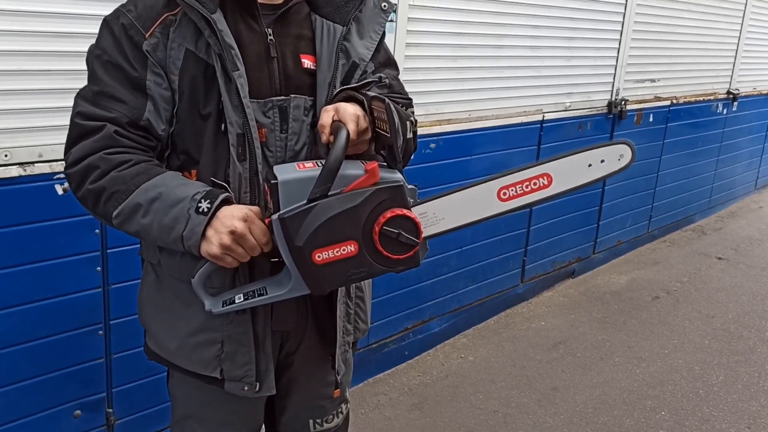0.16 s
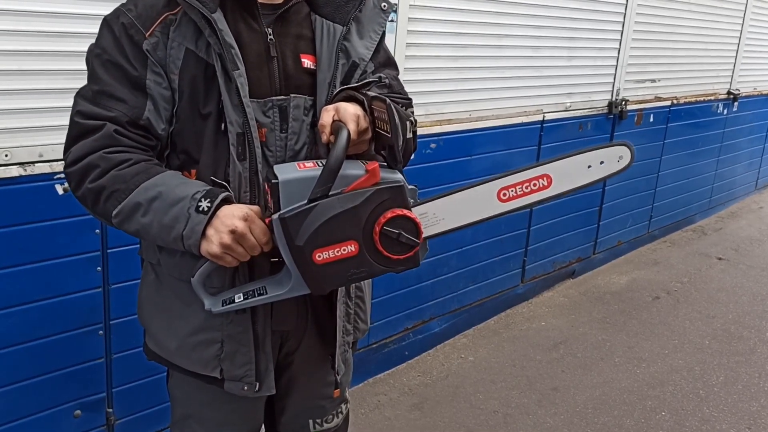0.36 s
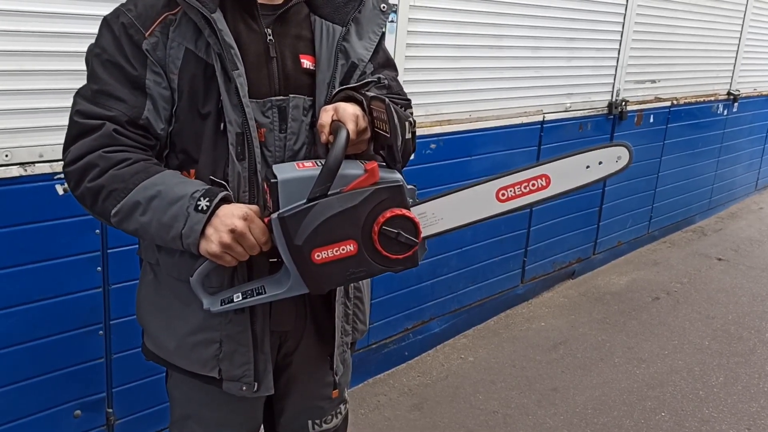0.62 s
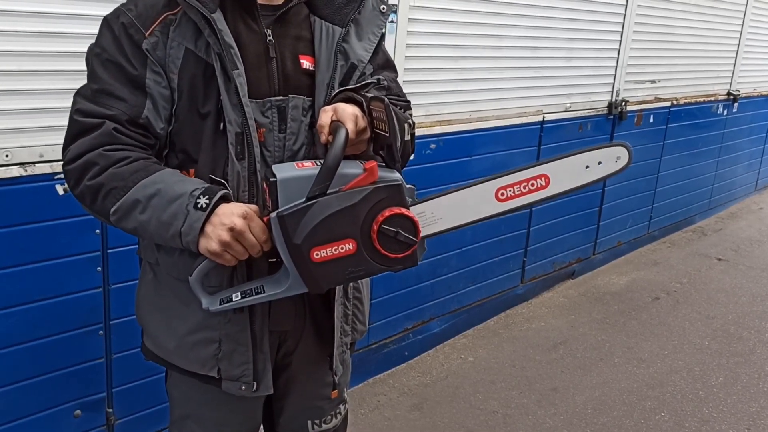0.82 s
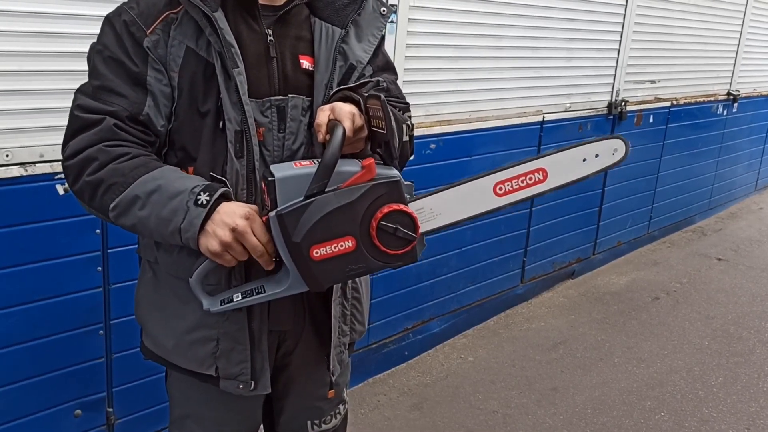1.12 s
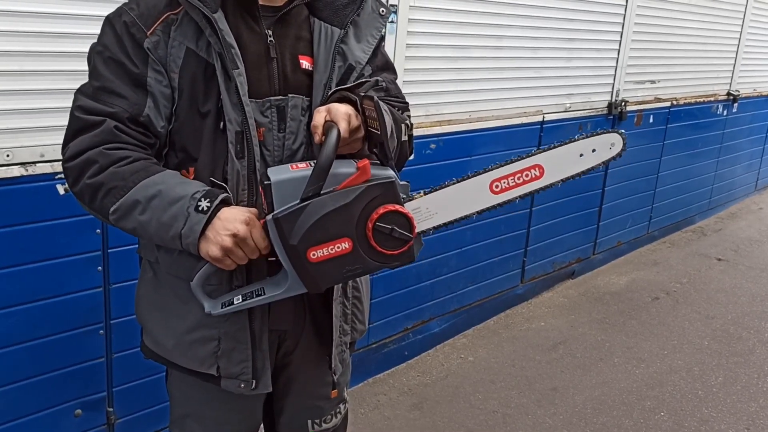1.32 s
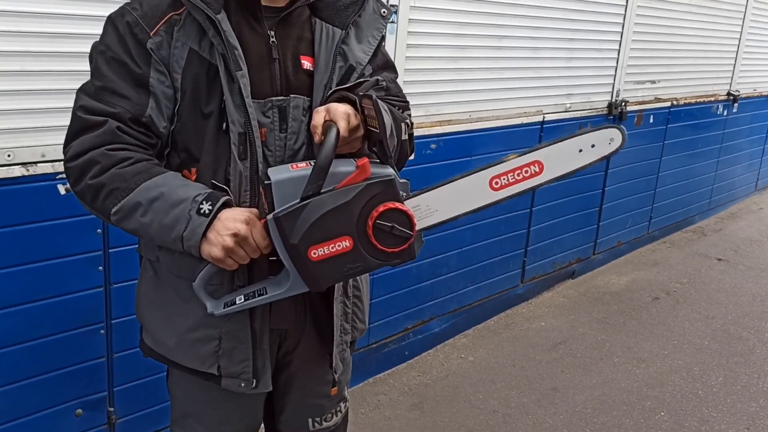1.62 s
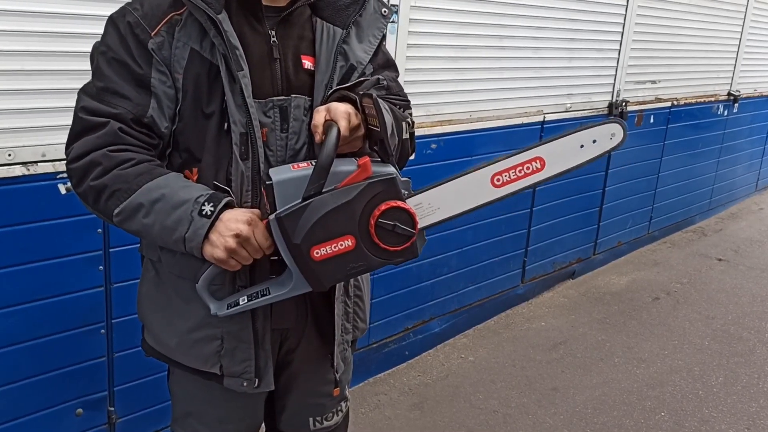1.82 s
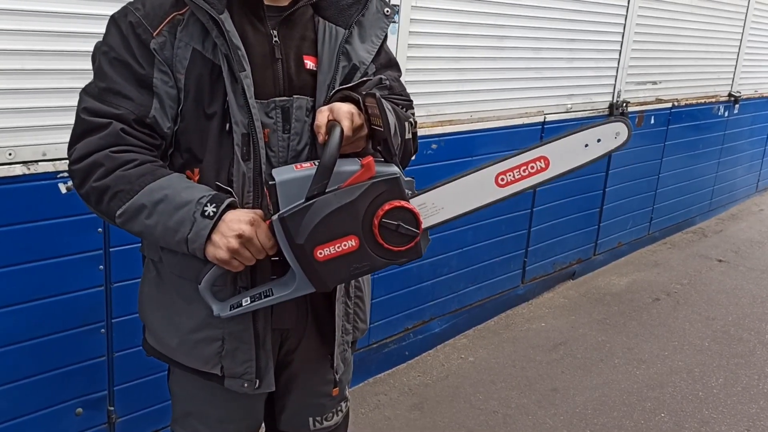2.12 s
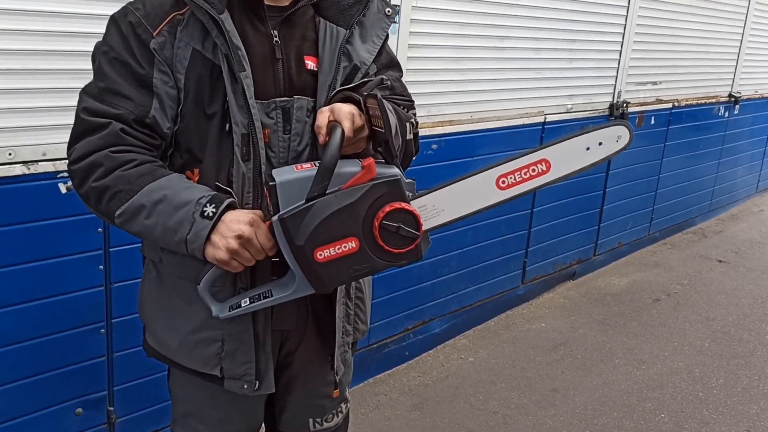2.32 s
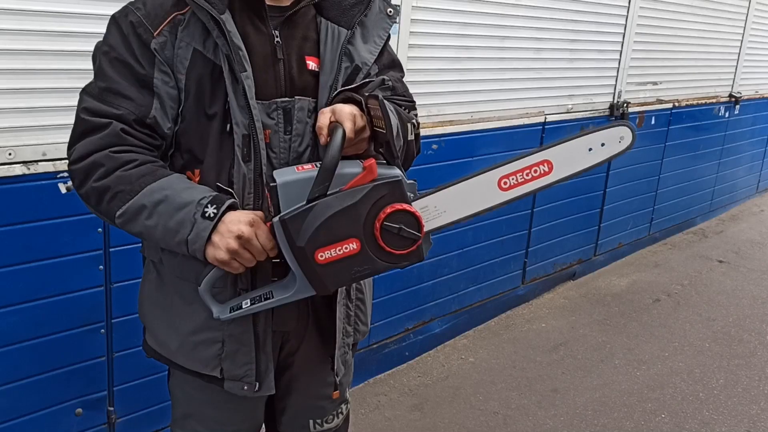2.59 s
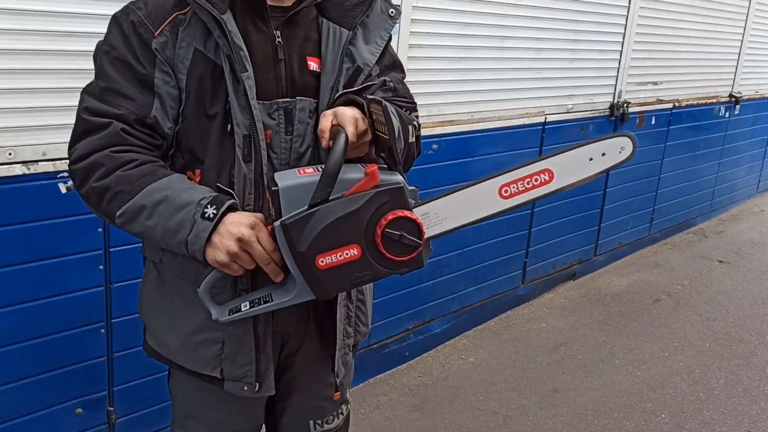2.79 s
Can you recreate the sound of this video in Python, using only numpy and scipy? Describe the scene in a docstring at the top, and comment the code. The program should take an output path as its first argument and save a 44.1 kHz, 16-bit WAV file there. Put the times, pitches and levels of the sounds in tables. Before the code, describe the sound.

Close electric chainsaw with bright metallic chain hiss and a rough gear whine, dropping to a clattering stop, a brief near-silence with faint hum and clicks, then a rising restart, full speed and final slowing, with short yard echo.

```python
"""A battery chainsaw runs free, outdoors beside a shuttered wall. The trigger is let go: the whine sinks
and the slackening chain rattles to a stop. A faint hum coasts down, trigger and switch click, the saw
spins up to full speed again and at the end winds down once more. One shaft speed drives the partials of
the whine, the noise bursts and hiss of the links and the struck modes of the bar; hum and clicks are
timed apart. Wall and yard echo the saw; open air and a dull rumble lie underneath."""
import sys
import numpy as np
from scipy import signal
from scipy.fft import rfft, irfft
from scipy.io import wavfile
from scipy.ndimage import uniform_filter1d

SR = 44100
rng = np.random.default_rng(int(sys.argv[2]) if len(sys.argv) > 2 else 0)


def persist_wave(psi):
    """Save psi, clipped to +-1, as 16-bit WAV."""
    counts = np.round(np.clip(psi, -1, 1) * 32767).astype(np.int16)
    wavfile.write(sys.argv[1], SR, np.atleast_2d(counts).T)


N = 130095
TIME_S = np.arange(N) / SR


def amp(db):
    """Decibels to gain."""
    return 10 ** (np.asarray(db) / 20)


def unit(x):
    """Scales to rms 1."""
    return x / np.sqrt(np.mean(x ** 2) + 1e-20)


def curve(points, at, axis=1):
    """Reads one column of a table along straight lines."""
    table = np.array(points, float)
    return np.interp(at, table[:, 0], table[:, axis])


def spectrum(points, hz):
    """Reads a table on a log-frequency axis."""
    f, value = np.transpose(points)
    return np.interp(np.log(hz + 1), np.log(f), value)


def colour(x, points):
    """Minimum-phase filter of unit energy, shaped by the given spectrum."""
    size = 8192
    log_gain = np.log(amp(spectrum(points, abs(np.fft.fftfreq(size, 1 / SR)))))
    taps = np.fft.ifft(np.exp(signal.hilbert(log_gain).conj())).real[:size // 2]
    return signal.fftconvolve(x, taps / np.linalg.norm(taps))[:N]


def wander(hz):
    """Slow random signal of rms 1, rolled off above the given rate."""
    f = np.fft.rfftfreq(N, 1 / SR)
    return unit(irfft(rfft(rng.standard_normal(N)) / (1 + (f / hz) ** 2), N))


def tail(x, decays):
    """Convolves with a dense 1 s noise tail, each band dying at its own t60."""
    hz, t, z = signal.stft(rng.standard_normal(SR), SR, nperseg=256)
    decay = np.exp(-np.log(1000) * t / spectrum(decays, hz)[:, None])
    taps = signal.istft(z * decay, SR)[1]
    taps[:SR // 200] = 0  # 5 ms gap
    return signal.fftconvolve(x, taps / np.linalg.norm(taps))[:N]


# sprocket speed before flutter [t/s, f/Hz]
SHAFT_SPEED = [(0, 109.25), (.108, 109.4), (.856, 109.55), (.87, 107.7), (.898, 99.9), (.982, 71.7),
               (1.02, 60.7), (1.112, 38.5), (1.2, 17), (1.228, 0), (1.555, 0), (1.58, 15.5), (1.65, 17.5),
               (1.675, 27), (1.7, 33.2), (1.8, 54.7), (1.88, 71.5), (1.992, 90.9), (2.092, 105.9),
               (2.156, 108.6), (2.33, 109.6), (2.652, 109.8), (2.702, 98.9), (2.764, 77.3), (2.858, 49.5),
               (2.95, 28)]
FLUTTER, FULL_LOAD_TURNS_PER_S2 = .001, 240


def shaft():
    """Speed, its integral in turns, and load: smoothed acceleration, positive when speeding up."""
    steady = curve(SHAFT_SPEED, TIME_S)
    acceleration = uniform_filter1d(np.gradient(steady) * SR, size=1500)
    load = np.clip(acceleration / FULL_LOAD_TURNS_PER_S2, -1, 1)
    speed = steady * (1 + FLUTTER * wander(hz=24.56))
    return speed, np.cumsum(speed) / SR, load


# strong drive partials [multiple of shaft speed (rounded), relative level/dB at full speed, power of speed]
DRIVE_ORDERS = [(3, -34, 0.35), (5, -17.5, 5.2), (6, -2, 1.8), (7, -5.5, 12), (8, -5.5, 12), (9, -14, 2.6),
                (11, -11, 3.9), (12, 2.5, 3.8), (13, -6, 4.9), (15, -17, 2.8), (16, -17.5, 2),
                (17, -10, 4.5), (18, -8.5, 0.48), (19, -22.5, 6), (21, -10.5, 3.8), (23, -18.5, 1),
                (25, -8, 5.9), (27, -9, 4.9), (30, 0.5, 7), (31, -18, 7), (33, -49, 7), (42, -14, 6.5),
                (87.5, -31, 6)]
# radiation of bar and housing [f/Hz, relative level/dB]
HOUSING = [(40, -60), (130, -21), (250, -9.5), (380, -3), (470, -10), (535, -11), (570, 2), (610, 1),
           (680, -4), (750, -1.5), (850, 17), (950, -2), (1100, 4), (1230, -2), (1315, -1.5), (1450, 5.5),
           (1620, 3.5), (1750, -7), (1950, -4), (3000, -13.5), (3300, -6), (5000, -20)]
WHINE_DB, LOAD_WHINE_DB = -25, 0.5
WHINE_ROUGH, LOAD_ROUGH, LOAD_JITTER_TURNS = 0.075, 0.28, .04


def whine(speed, turns, load):
    """Gear and sprocket partials slide through the housing resonances, rougher while speed changes."""
    full, out = speed.max(), np.zeros(N)
    rough = WHINE_ROUGH + LOAD_ROUGH * abs(load)
    for multiple, db, power in DRIVE_ORDERS:
        k = round(multiple)
        body_db = spectrum(HOUSING, k * speed) - spectrum(HOUSING, k * full)
        level = amp(db + body_db) * (speed / full) ** power
        level *= 1 + rough * wander(hz=32.5)
        cycles = k * turns + rng.random() + LOAD_JITTER_TURNS * load * wander(hz=45.3)
        out += level * np.sin(2 * np.pi * cycles)
    return np.sqrt(2) * amp(WHINE_DB + LOAD_WHINE_DB * load) * out


TEETH = 6


def link_hits(turns, spread_db):
    """One blow of random strength for each link that meets the sprocket."""
    contacts = np.diff(np.floor(turns * TEETH), prepend=0)
    return contacts * amp(spread_db * rng.standard_normal(N).clip(-2, 2))


# clatter of the links [f/Hz, relative density/dB per Hz]
CLATTER = [(60, -35.5), (200, -27.5), (360, -27.5), (500, -15.5), (600, -8), (780, 0), (1050, -3),
           (1280, -2), (1700, -4.5), (2200, -3), (2450, 2), (2800, -2), (3250, 7), (3700, 5.5), (4100, 5.5),
           (4700, 5.5), (4900, -3.5), (5900, 2), (6200, 10), (6900, 7), (7600, 5.5), (7750, -4),
           (8450, -6.5), (8700, -24.5), (11450, -22.5), (16000, -35.5)]
# clatter against shaft speed [f/Hz, relative level/dB]
CLATTER_BY_SPEED = [(0, -60), (4, -16), (12, -10.5), (25, -2), (35, -3.5), (60, 0), (110, -1)]
# top fizz of the sliding chain [f/Hz, relative density/dB per Hz]
FIZZ = [(9000, -47), (11400, -30), (11650, 3), (12600, -4), (14000, 1), (15800, -1.5)]
CLATTER_DB, SHAKE_DB, TURN_DEPTH = -18, 0.71, 0.038
LINK_SHARE, LINK_SPREAD_DB, LINK_DECAY_S = 0.077, 6, 0.0023
FIZZ_DB, FIZZ_POWER = -29, 0.23


def clatter(speed, turns):
    """Links burst over the hiss of the chain sliding in its groove; fizz grows with speed."""
    decay = np.exp(-1 / (LINK_DECAY_S * SR))
    bursts = signal.lfilter([1], [1, -decay], link_hits(turns, LINK_SPREAD_DB))
    grain = LINK_SHARE * unit(bursts / np.sqrt(speed + 10)) + 1 - LINK_SHARE
    level = amp(curve(CLATTER_BY_SPEED, speed) + SHAKE_DB * wander(hz=50))
    level *= 1 + TURN_DEPTH * np.cos(2 * np.pi * turns)
    rub = unit(grain) * level * rng.standard_normal(N)
    fizz = colour(rub * (speed / speed.max()) ** FIZZ_POWER, FIZZ)
    return amp(CLATTER_DB) * colour(rub, CLATTER) + amp(FIZZ_DB) * fizz


# short ringing of chain and bar [f/Hz, t60/s]
STEEL = [(200, 0.046), (900, 0.087), (2500, 0.099), (4000, .18), (6800, 0.28), (14000, 0.17)]
STEEL_DB = -10


def steel_ring(chain):
    """Chain and bar ring on briefly after each contact."""
    return (chain + amp(STEEL_DB) * tail(chain, STEEL)) / np.hypot(1, amp(STEEL_DB))


# bar modes [f/Hz, width/Hz, relative level/dB]
BAR_MODES = [(729, 43, -4.5), (818, 120, -2), (855, 32.6, 1), (1204, 90, -9.5), (1480, 170, -11),
             (1950, 250, -14), (2493, 75, -13), (3280, 160, -10.5), (4100, 120, -10.5)]
# slap against shaft speed [f/Hz, relative level/dB]
SLAP_BY_SPEED = [(0, -60), (4, -5), (15, -2), (28, 2), (47, 0.5), (58, -1.5), (72, -2), (85, -9),
                 (100, -16.5), (110, -13.5)]
SLAP_DB, LOAD_SLAP_DB, SLAP_SPREAD_DB, NOSE_LAG_TURNS = -19.5, 1.5, 2.5, .07


def slap(speed, turns, load):
    """At low speed the slack chain beats on the bar, at sprocket and nose, and excites its modes."""
    blows = link_hits(turns, SLAP_SPREAD_DB) + link_hits(turns + NOSE_LAG_TURNS, SLAP_SPREAD_DB)
    hits = blows * rng.choice([-1, 1], N) / np.sqrt(speed + 2)
    t, ring = TIME_S[:SR // 4], np.zeros(SR // 4)
    for k, (hz, width_hz, db) in enumerate(BAR_MODES):
        mode = np.exp(-np.pi * width_hz * t) * np.sin(2 * np.pi * hz * t)
        ring += (-1) ** k * amp(db) * np.sqrt(width_hz) * mode
    level = amp(SLAP_DB + curve(SLAP_BY_SPEED, speed) + LOAD_SLAP_DB * load)
    return signal.fftconvolve(unit(hits) * level, ring / np.linalg.norm(ring))[:N]


# click times and levels [t/s, knock level/dB, knock centre f/Hz, tick level/dB, tick time constant/s]
CLICKS = [(1.324, -42, 1500, -29, 0.019), (1.444, -10.5, 1910, -40, 0.0098),
          (1.52, -27.5, 800, -37.5, .015), (1.552, -12.5, 1270, -24.5, 0.012),
          (1.564, -9.5, 1220, -28, 0.0036)]
# plastic housing modes [f/Hz, relative level/dB, t60/s]
CASE_MODES = [(715, -3.5, 0.089), (872, 4.5, 0.084), (1000, -7, 0.072), (1254, 1, 0.027), (1620, -2, 0.027),
              (1796, 0, 0.04), (2200, 0, 0.015), (3230, -7.5, 0.049), (3730, -12, 0.032)]
# tick [f/Hz, relative density/dB per Hz]
TICK = [(50, -42), (200, -27), (500, -5), (800, 7), (2500, -2), (3800, 12), (5500, 0), (7500, 1),
        (9000, -31), (11400, -32), (12000, -19), (16000, -20)]
KNOCK_WIDTH_OCTAVES = 0.57


def clicks():
    """Trigger, switch and chain knock the housing modes near each click's pitch and add a noise tick."""
    knocks, ticks = np.zeros(N), np.zeros(N)
    for start, knock_db, centre_hz, tick_db, decay_s in CLICKS:
        t = np.maximum(TIME_S - start, 0)
        for k, (hz, db, t60) in enumerate(CASE_MODES):
            reach = 1 / (1 + (np.log2(hz / centre_hz) / KNOCK_WIDTH_OCTAVES) ** 2)
            mode = np.exp(-np.log(1000) * t / t60) * np.sin(2 * np.pi * hz * t)
            knocks += (-1) ** k * .5 * reach * amp(knock_db + db) * mode
        ticks += amp(tick_db) * (t > 0) * np.exp(-t / decay_s)
    return knocks + colour(ticks * rng.standard_normal(N), TICK)


# low hum that coasts on while the chain stands [t/s, f/Hz, level/dB before waver]
HUM = [(1.15, 235, -60), (1.24, 221.7, -41), (1.33, 196.8, -47), (1.45, 162.2, -47), (1.53, 158, -48),
       (1.6, 145, -65)]
HUM_OCTAVE_DB, HUM_WAVER = -5, .25


def hum():
    """A faint sinking sine with its octave, wavering in level."""
    phase = 2 * np.pi * np.cumsum(curve(HUM, TIME_S)) / SR
    sounding = (TIME_S > HUM[0][0]) * (TIME_S < HUM[-1][0])
    level = amp(curve(HUM, TIME_S, axis=2)) * sounding * (1 + HUM_WAVER * wander(hz=30))
    return level * (np.sin(phase) + amp(HUM_OCTAVE_DB) * np.sin(2 * phase))


# decay of wall and yard [f/Hz, t60/s]
YARD = [(200, 0.33), (900, 0.35), (2000, 0.43), (4000, 0.36), (7000, 0.36), (14000, 0.26)]
YARD_DB = -9.5


def yard_echo(saw):
    """Wall and yard return a dense tail, longest around 2 kHz."""
    return amp(YARD_DB) * tail(saw, YARD)


# open air [f/Hz, relative density/dB per Hz]
AIR = [(20, -47), (60, -16.5), (130, -13), (400, -2.5), (900, -11.5), (2500, -15), (7000, -18), (9000, -47),
       (16000, -42)]
AIR_DB = -47.5
# rumble of handling and coasting parts [t/s, level/dB]
RUMBLE_LEVEL = [(0, -64), (.15, -69), (.175, -46), (.22, -75), (1.05, -70), (1.2, -57), (1.32, -48.5),
                (1.4, -55), (1.47, -51), (1.56, -60), (1.75, -70), (2.95, -74)]
# rumble [f/Hz, relative density/dB per Hz]
RUMBLE = [(30, -22), (60, -25), (95, 7), (170, 3), (300, -8), (600, -12), (2000, -55)]


def background():
    """Two filtered noises: steady open air and the dull, swelling rumble of the held saw."""
    air = amp(AIR_DB) * colour(rng.standard_normal(N), AIR)
    return air + amp(curve(RUMBLE_LEVEL, TIME_S)) * colour(rng.standard_normal(N), RUMBLE)


def scene():
    """The saw, its echo and the open air."""
    speed, turns, load = shaft()
    chain = steel_ring(clatter(speed, turns))
    rattle = chain + slap(speed, turns, load) + clicks()
    tones = whine(speed, turns, load) + hum()
    saw = rattle + tones
    return (saw + yard_echo(saw) + background())[None]


EDGE_HZ = 15800


def record(dry):
    """Linear-phase low-pass: the upper band limit."""
    taps = signal.firwin(1023, EDGE_HZ, window=("kaiser", 9), fs=SR)
    return signal.oaconvolve(dry, taps[None], "same")


dry = scene()
out = record(dry)
persist_wave(out)
```